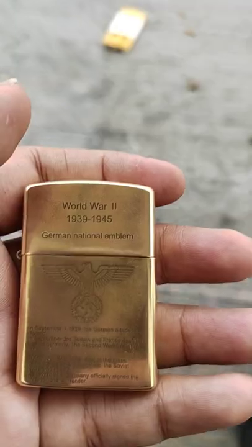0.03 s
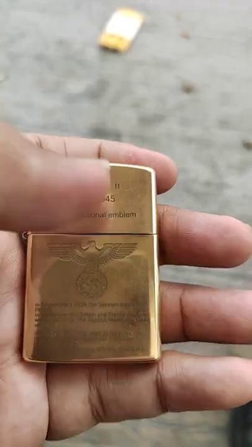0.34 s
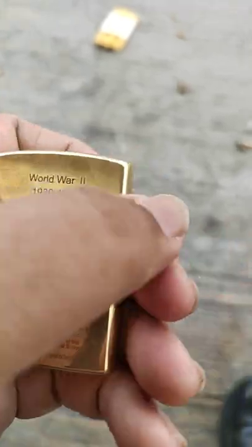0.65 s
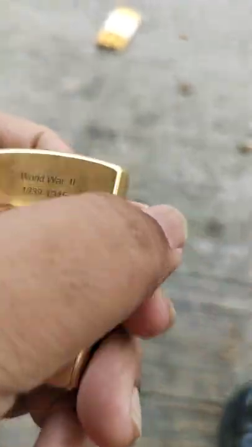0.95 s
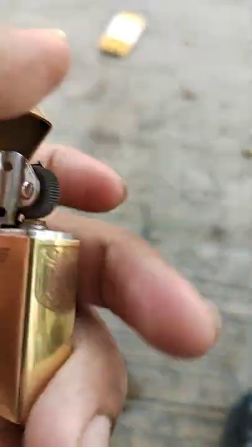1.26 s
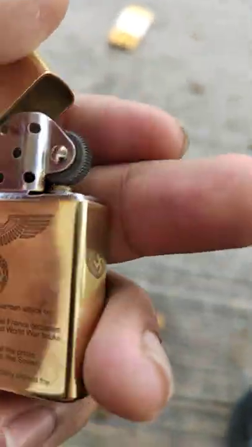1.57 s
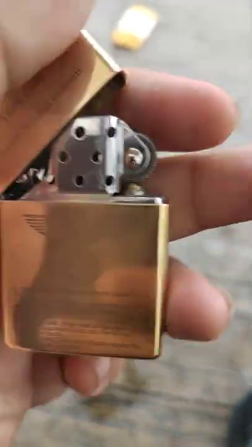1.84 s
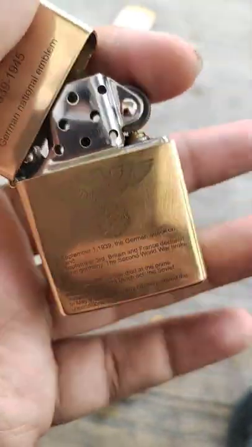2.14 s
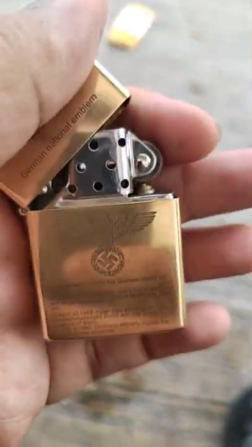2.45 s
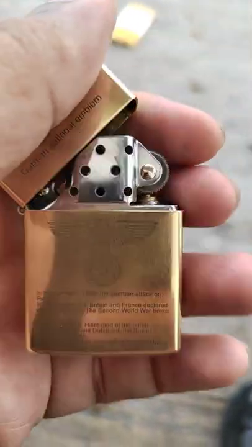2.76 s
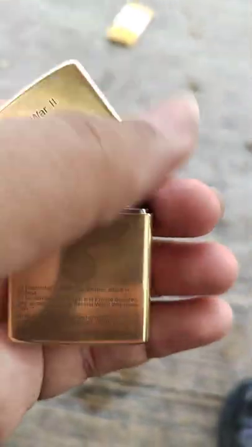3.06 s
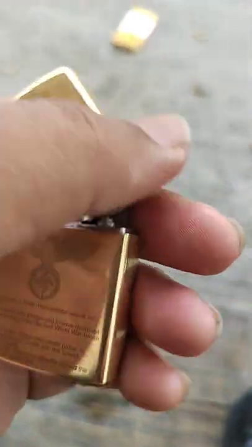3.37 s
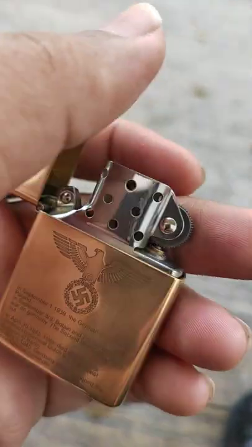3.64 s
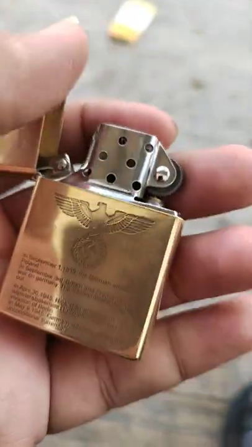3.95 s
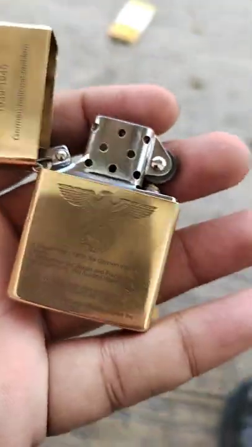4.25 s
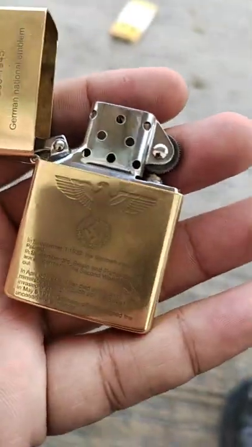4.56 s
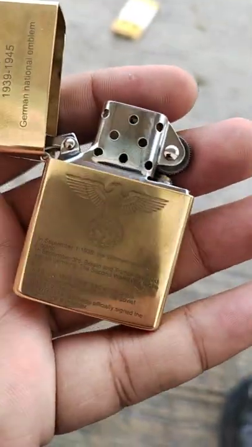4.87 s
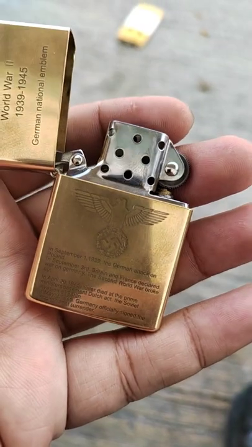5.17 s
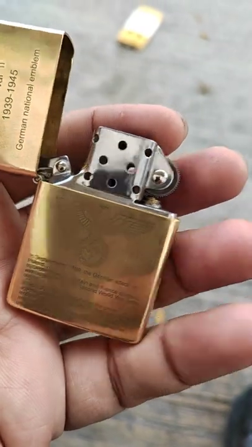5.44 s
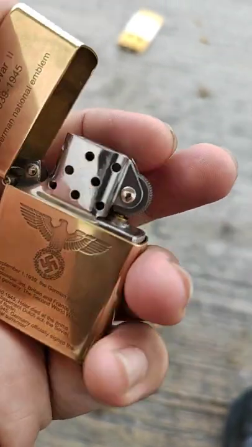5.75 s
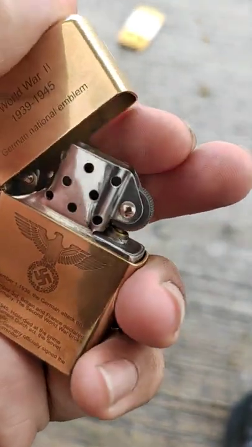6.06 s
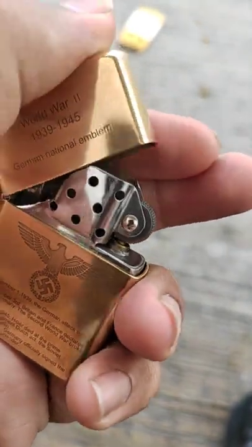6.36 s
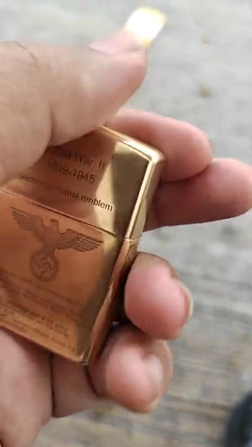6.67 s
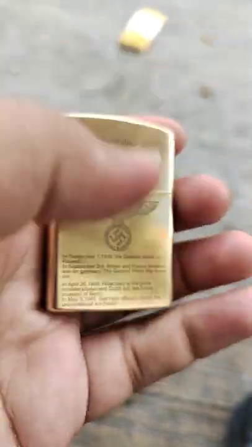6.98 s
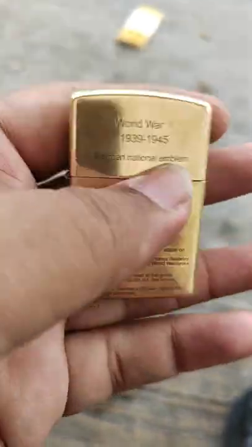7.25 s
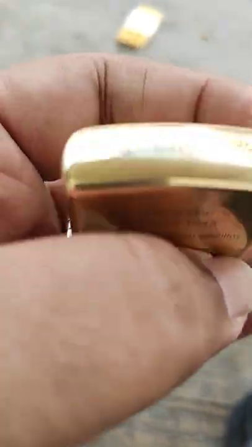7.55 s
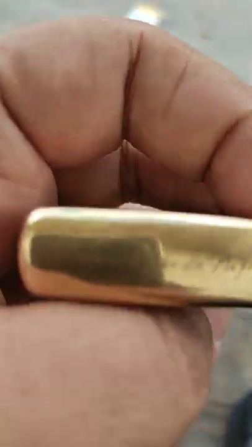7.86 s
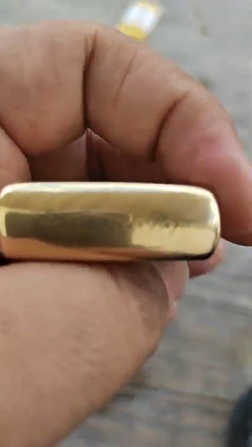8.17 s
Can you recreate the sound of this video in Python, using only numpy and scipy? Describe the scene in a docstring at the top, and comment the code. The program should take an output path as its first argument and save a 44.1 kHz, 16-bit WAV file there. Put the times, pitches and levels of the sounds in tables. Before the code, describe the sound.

Close thumb ticks, one bright clink of a lighter lid opening, then a sharp snap shut and a small knock, over quiet hum.

```python
"""A soft hiss and low hum come first, with faint far-off chirps. Then, close up, a thumb ticks on a
brass flip-top lighter, flicks the lid open (one clink) and snaps it shut (the cam that holds the lid
trips, then the rim lands). Last, the closed lid gives a small knock. Each hit makes the metal ring,
and the surroundings echo faintly. Each swing of the lid pushes a puff of air at the two
microphone ports, the small holes that let the sound in."""
import sys
import numpy as np
from scipy import signal
from scipy.fft import rfft, irfft
from scipy.io import wavfile
from scipy.ndimage import uniform_filter1d, minimum_filter1d

SR = 44100
rng = np.random.default_rng(int(sys.argv[2]) if len(sys.argv) > 2 else 0)


def file_out(sig):
    """Save sig as 16-bit WAV at sys.argv[1]."""
    # one column per channel
    cols = np.atleast_2d(sig).T
    # limit, then scale
    lim = np.clip(cols, -1, 1)
    pcm = np.round(lim * 32767).astype(np.int16)
    wavfile.write(sys.argv[1], SR, pcm)


N = 366471
BIN_HZ = np.fft.rfftfreq(2048, 1 / SR)  # the pitches at which a tone colour is worked out


def lid(chatter_db=-16, chatter_s=0.0043, crack_s=0.00068, clamp_after_s=.0062, clamp_decay_s=.0015):
    """Each hit of metal on metal makes a crack, a short rattle of the hinge, a ring and its echoes."""
    # The lid hits its stop, the cam trips, the rim lands, the closed lid knocks. Columns: start_s,
    # place, contact_s, left_lag_s, lid_db, cam_db, case_db, shell_db, crack_db, echo_db
    hits = [ (3.5051, "stop", .00094, .00029, -6.5, -23, -24, -38.8, -17, -3.5),
            (6.4938, "cam", .00137, .00031, -26.5, -8, -15, -24.4, -16, -2),
            (6.5027, "rim", .00096, .00026, -25, -23, -1.4, .5, -16, -4),
            (7.518, "rim", .00019, .000266, -62, -60, -38, -38, -42, -4)]
    # The parts that ring: lid, cam (its spring), case (lower half), shell (lid and case shut together)
    parts = ("lid", "cam", "case", "shell")
    # Tone of the crack at each place of contact: pitch_hz, level_db
    crack_colours = { "stop": [(200, -32), (1000, -1), (1650, 2), (2700, -14), (3500, -7), (4100, 8),
                     (5500, 11), (6500, 1), (8500, 19), (11500, -14), (12800, 4), (14500, -1), (15600, -1)],
                     "cam": [(200, -30.5), (1000, -9.5), (1650, -11.5), (2700, -8), (3500, -3), (4100, -8),
                     (5500, 0.5), (6500, 1.5), (8500, -5), (11500, -8), (12800, -0.5), (14500, 1),
                     (15600, -7)], "rim": [(200, -31), (1000, 2), (1650, -7), (2700, -5), (3500, -14.5),
                     (4100, -7), (5500, -5.5), (6500, 9), (8500, -5), (11500, -7), (12800, -7.5),
                     (14500, 4), (15600, -7)]}
    # Tone of the echoes: pitch_hz, level_db
    echo_colour = [(1000, -2.5), (2100, -0.5), (4000, 4.5), (5200, -4.5), (6100, 4), (7700, -4),
                   (8450, -6.5), (9500, -2), (11500, -3), (13000, 2.5), (15000, -2.5)]
    out = np.zeros((2, N))
    for start_s, place, contact_s, left_lag_s, *drive_db, crack_db, echo_db in hits:
        sound = metal_ring(dict(zip(parts, drive_db)), contact_s, left_lag_s)
        if place == "cam":  # the landing rim stops the ringing spring
            t = np.arange(sound.shape[1]) / SR
            sound *= np.exp(-np.maximum(t - clamp_after_s, 0) / clamp_decay_s)
        snap_and_rattle = burst(1, crack_s) + amp(chatter_db) * burst(1, chatter_s)
        crack = coloured(snap_and_rattle, crack_colours[place])
        add(sound, 0, amp(crack_db) * panned(-6) * crack)
        add(out, start_s, sound)
        add(out, start_s, coloured(surroundings(sound, echo_db), echo_colour))
    return out


def metal_ring(drive_db, contact_s, left_lag_s):
    """Each part's own tones swell while the metal touches, then die fast in the hand that holds it."""
    # The lighter's natural tones: pitch_hz, level_db, ring_s (time to fall 60 dB), pan_db, part
    tones = [ (2135, -18.4, .047, -15, "lid"), (2759, -24, .0055, -4, "lid"), (4872, -19.5, .043, 4, "lid"),
             (5098, -23.4, .028, 11, "lid"), (5316, -20.6, .0093, 8, "lid"), (5577, -17, .0126, 0, "lid"),
             (8069, -14.7, .0048, 17, "lid"), (8886, -15.3, .01, -15, "lid"),
             (9830, -24.7, .0097, -3, "lid"), (10667, -23.4, .0092, -9, "lid"),
             (11702, -17.4, .0068, -1, "lid"), (14626, -15, .0096, -7, "lid"),
             (15011, -24.4, .015, -9, "lid"), (5005, -25.8, .043, -21, "cam"), (7784, -6.7, .032, 0, "cam"),
             (8861, -23, .021, -5, "cam"), (12107, -26.9, .013, -8, "cam"), (13244, -30.5, .011, -3, "cam"),
             (14427, -19.6, .015, 0, "cam"), (14965, -21.2, .009, 7, "cam"),
             (15299, -24.8, .019, -10, "cam"), (2133, -16.3, .019, -10, "case"),
             (10588, -17.3, .0115, -15, "case"), (11049, -23, .0043, -15, "case"),
             (11530, -21.5, .01, -12, "case"), (14399, -19.6, .008, 2, "case"),
             (2270, -27.6, .0055, -14, "shell"), (3062, -34.1, .0195, 15, "shell"),
             (3751, -39.9, .0067, 10, "shell"), (4727, -20.4, .0106, -5, "shell"),
             (5135, -19, .0125, -14, "shell"), (5653, -29, .007, 2, "shell"),
             (6829, -19.8, .031, -6, "shell"), (7474, -19.8, .0136, 6, "shell"),
             (7822, -13.5, .023, 0, "shell"), (8211, -15, .0056, 8, "shell"),
             (8497, -8.6, .0105, -9, "shell"), (9162, -18.5, .012, -10, "shell"),
             (9703, -19, .006, -9, "shell"), (4870, -45, .4, 3, "lid"), (5030, -46, .25, 2, "cam")]
    t = np.maximum(np.arange(SR // 4) / SR - np.array([[left_lag_s], [0]]), 0)  # left is farther away
    out = np.zeros(t.shape)
    for k, (pitch_hz, level_db, ring_s, pan_db, part) in enumerate(tones):
        decay = np.exp(-np.log(1000) * (t - contact_s) / ring_s)
        tone = amp(level_db + drive_db[part]) * decay * np.sin(2 * np.pi * pitch_hz * t)
        out += (-1) ** k * panned(pan_db) * tone  # neighbouring tones swing opposite ways
    swell = np.sin(np.pi / 2 * np.minimum(t / contact_s, 1)) ** 2
    return out * swell


def air_puffs(push_s=0.0011, lag_s=0.001713, settle_s=.035, overshoot_s=.11, left_db=-13):
    """The lid pushes air ahead and sucks it behind; the microphone settles with one long overshoot."""
    # Air moved by the swinging lid: start_s, push_db, suction_db
    puffs = [(3.5043, -22, -21.5), (6.4936, -29, -35), (6.5028, -36, -34)]
    out, t = np.zeros((2, N)), np.arange(SR) / SR
    push = np.exp(-((t - lag_s) / push_s) ** 2) * np.minimum(t / lag_s, 1)
    after = np.maximum(t - lag_s, 0)
    settling = overshoot_s * np.exp(-after / settle_s) - settle_s * np.exp(-after / overshoot_s)
    suction = settling / (overshoot_s - settle_s) * (1 - np.exp(-after / 0.000046))
    for start_s, push_db, suction_db in puffs:
        puff = amp(push_db) * push - amp(suction_db) * suction
        add(out, start_s, amp([[left_db], [0]]) * puff)
    return out


def thumb(ping_db=-1, ping_s=0.00094, rise_s=0.00027):
    """The thumb sticks and slips: each dry tick is a tiny scrape and a ping of the hollow ports."""
    # The thumb catching on the case: start_s, level_db, decay_s, pan_db
    ticks = [(.7937, -45, .001, -3), (0.7987, -40, 0.0011, 0), (0.803, -36.5, 0.0014, -4),
             (.8062, -45, .001, -3), (3.2981, -41, .0003, -14), (3.3031, -37, .0003, -14),
             (7.437, -51, .0008, -22), (7.4413, -44, 0.00074, -22), (7.4457, -42, 0.00086, -22),
             (7.4485, -50, 0.00087, -18)]
    # Tone of the scrape, on top of the ports' own colour: pitch_hz, level_db
    scrape_tilt = [(500, -43), (2500, -23), (4200, -8.5), (5700, 5), (7500, -5), (9000, 7), (10300, 6),
                   (12000, -2), (15000, -8)]
    # Pitches at which the ports ring: covered_left_hz, left_hz, right_hz
    port_pitches = (5780, 8400, 9000)
    covered_hz, left_hz, right_hz = port_pitches
    out, t = np.zeros((2, N)), np.arange(2048) / SR
    for start_s, level_db, decay_s, pan_db in ticks:
        colour = port_colour([start_s])[:, 0] * amp(read(scrape_tilt, BIN_HZ))
        pitch_hz = np.array([[left_hz + finger_cover(start_s) * (covered_hz - left_hz)], [right_hz]])
        envelope = np.exp(-t / min(ping_s, decay_s)) * (1 - np.exp(-t / rise_s))
        ping = np.sin(2 * np.pi * pitch_hz * t) * envelope
        tick = burst(colour, decay_s, rise_s) + amp(ping_db) * ping
        add(out, start_s, amp(level_db) * panned(pan_db) * tick)
    return out


def surroundings(sound, echo_db, near_db=-25, near_ring_s=0.04, far_db=-28.0, far_ring_s=0.255):
    """Sound scatters off the hands, bounces off floor and walls, and leaves a faint tail."""
    # Bounces from floor and walls: delay_s, level_db
    echoes = [(.0215, -48), (.0315, -33), (.0337, -37), (.036, -34), (.0425, -40), (.069, -46)]
    t = np.arange(SR // 2) / SR
    response = np.zeros((2, len(t)))
    for level_db, ring_s, delay_s in ((near_db, near_ring_s, .002), (far_db + echo_db, far_ring_s, .025)):
        tail = rng.standard_normal(response.shape) * np.exp(-np.log(1000) * t / ring_s) * (t > delay_s)
        response += amp(level_db) * tail / np.linalg.norm(tail, axis=1, keepdims=True)
    for delay_s, level_db in echoes:
        add(response, delay_s, amp(level_db + echo_db) * panned(3.7))
    return signal.fftconvolve(sound, response, axes=1)


def rumble_and_hiss(patchy_db=0.72):
    """A low rumble that both ports share, and a separate hiss in each."""
    # How alike left and right are: pitch_hz, likeness (1 = the same, 0 = unrelated)
    likeness = [(100, .98), (270, 1), (450, 0.7), (740, -0.16), (1200, 0.56), (2000, -0.29), (3300, -0.015),
                (15000, -0.042)]
    times = np.arange(N // 512 + 5) * 512 / SR
    draws = rng.standard_normal((5, len(times), len(BIN_HZ)))
    shared, separate = draws[0] + 1j * draws[1], draws[2] + 1j * draws[3]
    # the level wavers a little over time and pitch
    patches = evened(uniform_filter1d(uniform_filter1d(draws[4], size=10, axis=0), size=24, axis=1))
    alike = np.clip(read(likeness, BIN_HZ), -1, 1)
    spectra = np.array([shared, alike * shared + np.sqrt(1 - alike ** 2) * separate])
    spectra *= port_colour(times) * amp(patchy_db * patches)
    return signal.istft(spectra.swapaxes(1, 2), SR, nperseg=2048, noverlap=1536, scaling="psd")[1][:, :N]


def port_colour(times):
    """Background tone by side, time and pitch; a finger over the left port lowers its ringing pitch."""
    # Rumble of the surroundings: pitch_hz, left_db_per_hz, right_db_per_hz
    rumble = [(14.84, -83.5, -83.5), (34.9, -84.5, -86), (55, -82, -84.5), (91.4, -82.5, -82),
              (162.4, -84.5, -86.5), (267, -84, -84.5), (378, -86.5, -90.5), (455, -89, -94.5),
              (780, -96, -92.5), (1022, -97, -92), (1347, -93.5, -96), (2021, -99.3, -100.3)]
    # Hiss in the ports: pitch_hz, covered_left_db_per_hz, left_db_per_hz, right_db_per_hz
    hiss = [(2750, -102.3, -105.0, -102.2), (3910, -102.8, -105.5, -104.9), (4307, -98.5, -102.5, -104.2),
            (5450, -99.5, -107.4, -108.4), (6900, -96, -107.6, -108.3), (7560, -101.9, -102.8, -105.5),
            (8500, -109.1, -99.8, -102.1), (8970, -114.3, -104.8, -101.0), (9700, -117.3, -111.8, -107.8),
            (10660, -119.3, -115.2, -113.8), (13390, -125.0, -120.8, -120.9),
            (14920, -109.1, -118.0, -117.9), (15480, -116.5, -124.1, -124.5),
            (15880, -144.7, -144.4, -144.5)]

    def joined(rumble_column, hiss_column):
        points = [(row[0], row[rumble_column]) for row in rumble]
        points += [(row[0], row[hiss_column]) for row in hiss]
        return amp(read(points, BIN_HZ))

    covered, left, right = joined(1, 1), joined(1, 2), joined(2, 3)
    share = finger_cover(times)[:, None]
    return np.array([covered ** share * left ** (1 - share), right * np.ones_like(share)])


def finger_cover(times):
    """How much of the left port a finger covers, from 0 to 1."""
    # The finger slides away: time_s, share_covered
    cover = [(1.2, 1.0), (1.36, 0.74), (1.52, 0.0)]
    return np.clip(np.interp(times, *np.transpose(cover)), 0, 1)


def motor(waver=0.33, wander_rad=0.86):
    """A far motor hums a few tones that waver in loudness and pitch."""
    # Tones of the hum: pitch_hz, level_db, waver_rate_hz
    tones = [(20.9, -68, .5), (66, -72, 1.0), (126.5, -69, 2.0), (892, -78, 7.84), (1393, -85, 11)]
    out, t = np.zeros(N), np.arange(N) / SR
    for pitch_hz, level_db, rate_hz in tones:
        loudness = np.sqrt(2) * amp(level_db) * (1 + waver * drift(rate_hz))
        out += loudness * np.sin(2 * np.pi * pitch_hz * t + wander_rad * drift(rate_hz))
    return out


def distant_chirps(width_hz=270, flutter_db=4.0, pan_db=3):
    """Each faint chirp is a narrow, fluttering band of noise that swells and fades."""
    # Far-off chirps: middle_s, swell_s (the fade takes as long), pitch_hz, level_db
    chirps = [(0.301, 0.29, 4400, -74), (0.597, .1, 4500, -80), (2.05, 0.09, 2950, -78),
              (3.198, 0.092, 4350, -77), (3.922, 0.11, 4600, -82), (4.141, .12, 4450, -78),
              (4.342, 0.095, 4500, -77), (4.84, 0.11, 4250, -79), (5.63, 0.093, 2950, -76),
              (5.952, .1, 5200, -80), (6.184, 0.15, 4450, -77), (6.335, 0.11, 4400, -76),
              (7.25, .1, 4550, -77), (7.6, .08, 4120, -77), (8.172, 0.11, 4250, -79)]
    out, flutter = np.zeros((2, N)), amp(flutter_db * drift(25))
    hz = np.fft.rfftfreq(SR, 1 / SR)
    for middle_s, swell_s, pitch_hz, level_db in chirps:
        swell = signal.windows.hann(round(2 * swell_s * SR))
        band = irfft(rfft(rng.standard_normal((2, SR))) * np.exp(-((hz - pitch_hz) / width_hz) ** 2), SR)
        chirp = evened(band[:, :len(swell)]) * swell
        add(out, max(middle_s - swell_s, 0), amp(level_db) * panned(pan_db) * chirp)
    return out * flutter


def burst(colour, decay_s, rise_s=.0001):
    """A brief stereo scrape of the given tone colour that dies away."""
    noise = irfft(colour * np.exp(2j * np.pi * rng.random((2, len(BIN_HZ)))))
    t = np.arange(noise.shape[1]) / SR
    envelope = np.exp(-t / decay_s) * (1 - np.exp(-t / rise_s))
    return np.array([evened(side * envelope) for side in noise]) * np.sqrt(np.mean(envelope ** 2))


def coloured(sound, points):
    """Shapes a sound's tone by (pitch_hz, level_db) points, with nothing heard before its cause."""
    cepstrum = irfft(np.log(amp(read(points, BIN_HZ))))
    half = len(cepstrum) // 2
    forward_only = np.r_[cepstrum[0], 2 * cepstrum[1:half]]
    response = irfft(np.exp(rfft(forward_only, len(cepstrum))))
    return signal.fftconvolve(sound, response[None, :half], axes=1)


def drift(rate_hz):
    """A slow random wobble of typical size 1, no faster than rate_hz."""
    hz = np.fft.rfftfreq(N, 1 / SR)
    return evened(irfft(rfft(rng.standard_normal(N)) * (hz < rate_hz), N))


def read(points, hz):
    """Reads between (pitch_hz, value) points, with octaves evenly spaced."""
    pitch_hz, value = np.transpose(points)
    return np.interp(np.log(hz + 1), np.log(pitch_hz + 1), value)


def amp(db):
    """Turns decibels into a gain."""
    return 10 ** (np.asarray(db) / 20)


def evened(x):
    """Scales a signal to a typical size (rms) of 1."""
    return x / np.sqrt(np.mean(x ** 2) + 1e-30)


def panned(pan_db):
    """Two gains that put the left side pan_db above the right."""
    return amp(np.array([[pan_db], [-pan_db]]) / 2)


def add(mix, start_s, sound):
    """Adds a stereo sound to the mix at start_s."""
    part = mix[:, round(start_s * SR):][:, :sound.shape[1]]
    part += sound[:, :part.shape[1]]


def scene():
    """The lighter close up, over the background."""
    return lid() + thumb() + air_puffs() + rumble_and_hiss() + motor() + distant_chirps()


def record(dry):
    """The sound comes in after a moment; a quick limiter holds the peaks; the top treble is cut."""
    ceiling, cutoff_hz = .8, 16100
    sound = dry * amp(np.interp(np.arange(N) / SR, [.066, .079, .082], [-50, -28, 0]))
    gain = minimum_filter1d(ceiling / np.maximum(abs(sound).max(0), ceiling), size=33)
    limited = sound * uniform_filter1d(gain, size=33)
    low_pass = signal.firwin(255, cutoff_hz, window=("kaiser", 8), fs=SR)
    return signal.oaconvolve(limited, low_pass[None], "same")


dry = scene()
out = record(dry)
file_out(out)
```